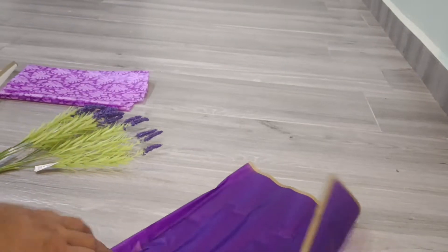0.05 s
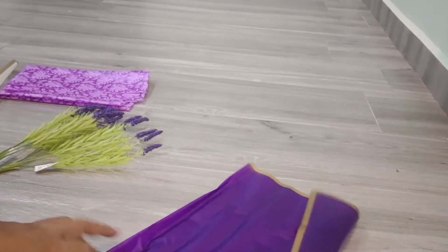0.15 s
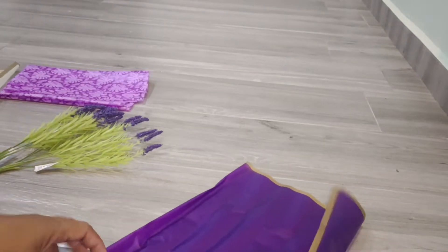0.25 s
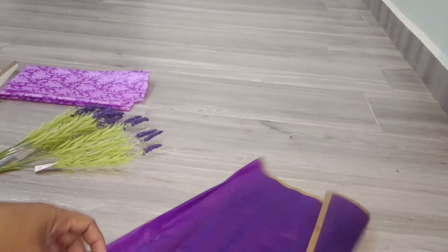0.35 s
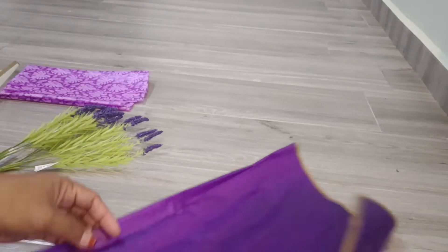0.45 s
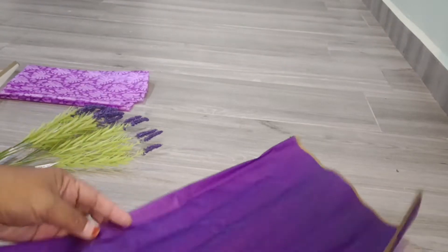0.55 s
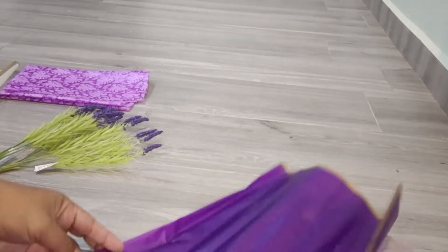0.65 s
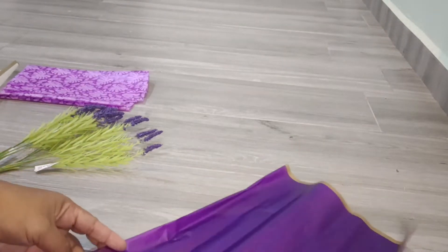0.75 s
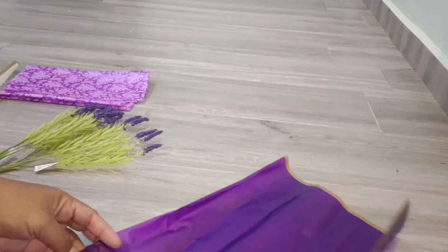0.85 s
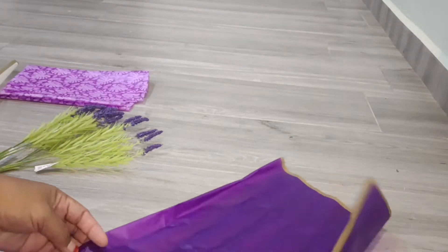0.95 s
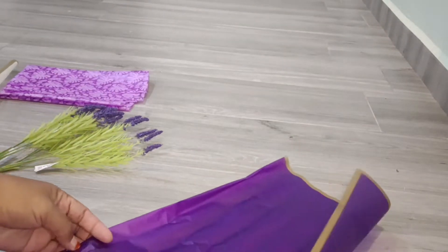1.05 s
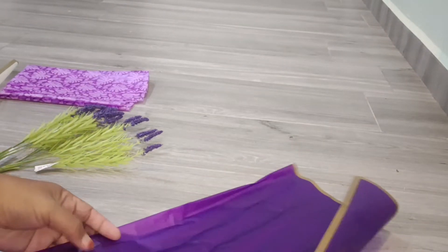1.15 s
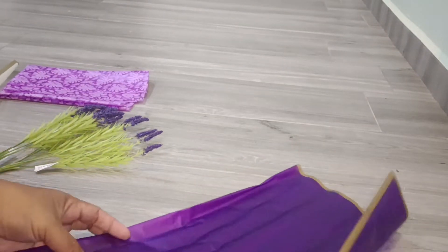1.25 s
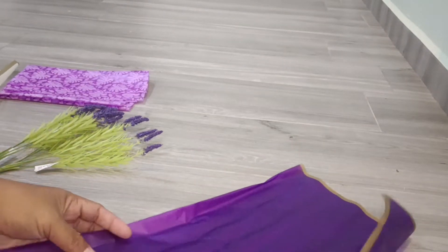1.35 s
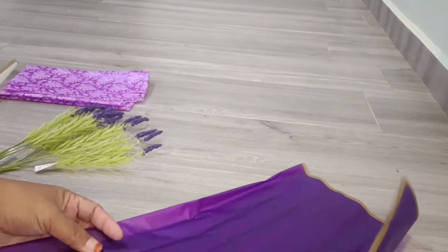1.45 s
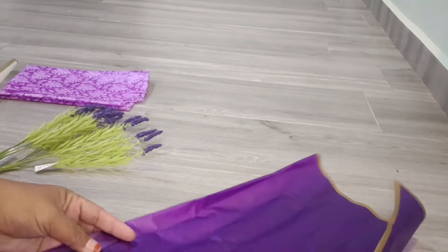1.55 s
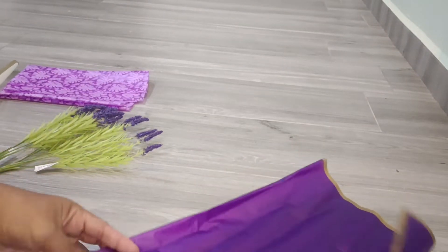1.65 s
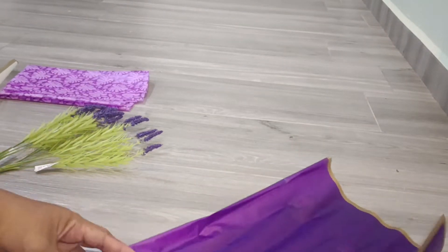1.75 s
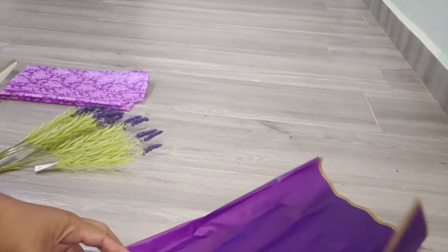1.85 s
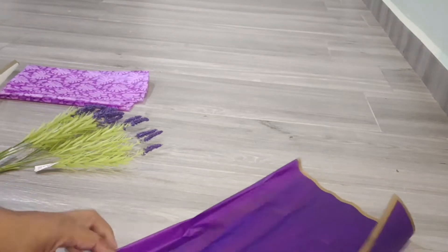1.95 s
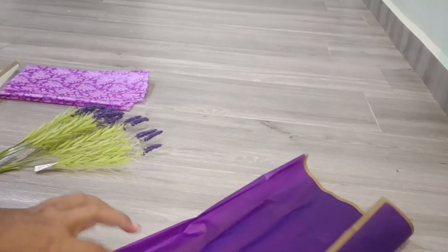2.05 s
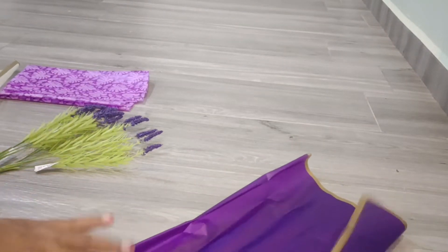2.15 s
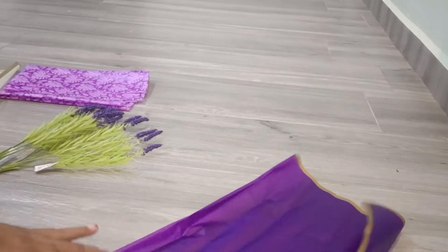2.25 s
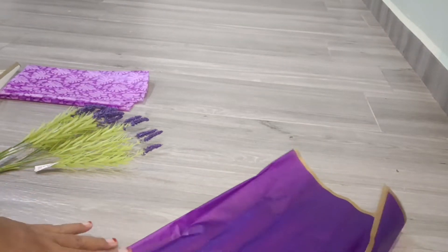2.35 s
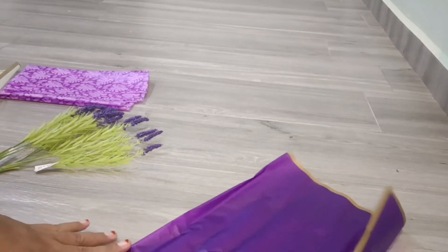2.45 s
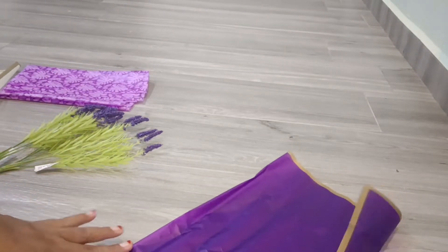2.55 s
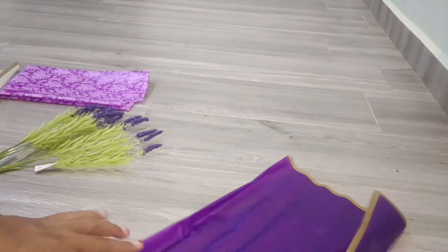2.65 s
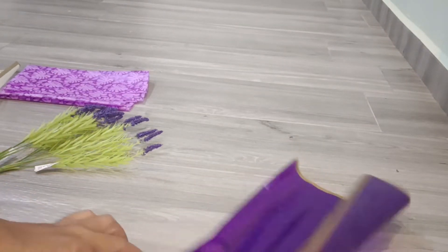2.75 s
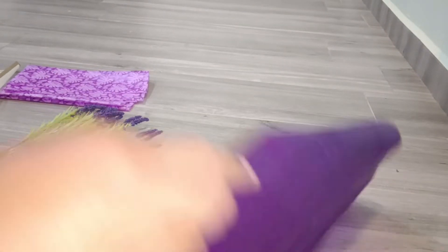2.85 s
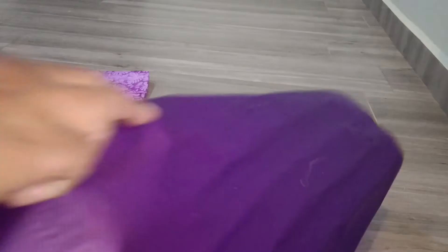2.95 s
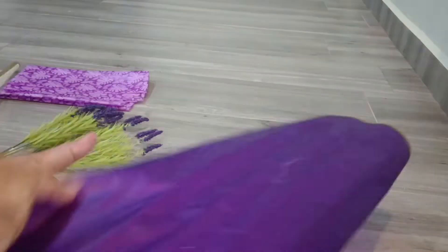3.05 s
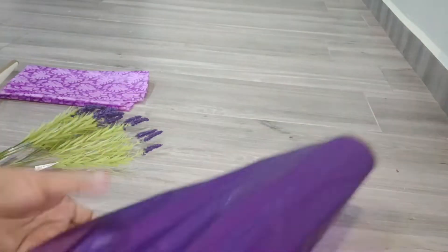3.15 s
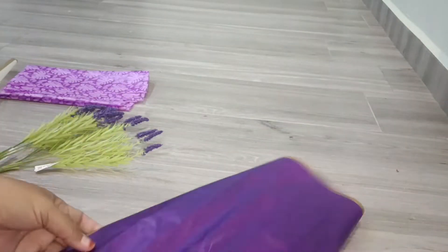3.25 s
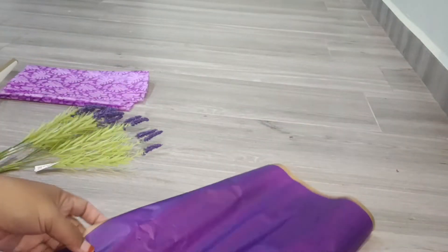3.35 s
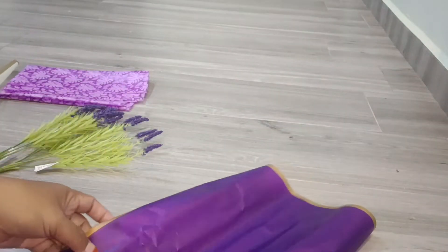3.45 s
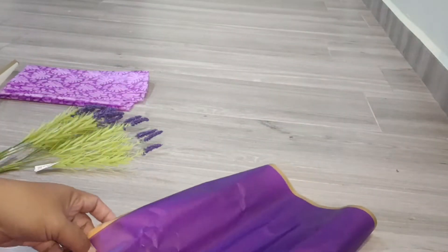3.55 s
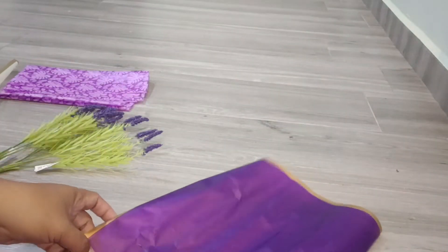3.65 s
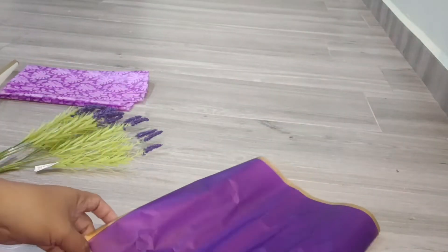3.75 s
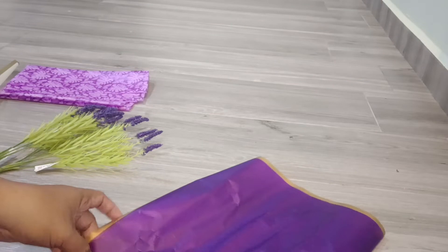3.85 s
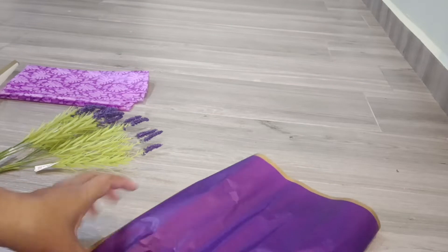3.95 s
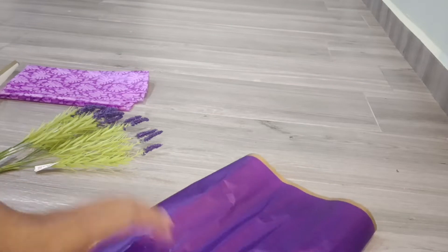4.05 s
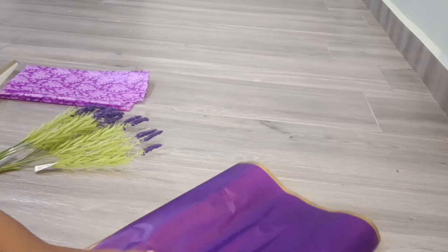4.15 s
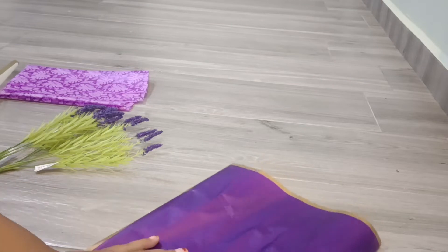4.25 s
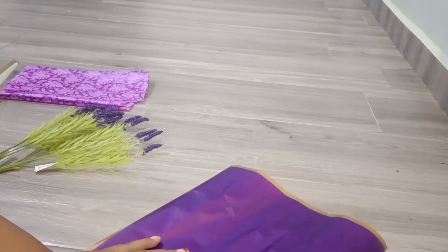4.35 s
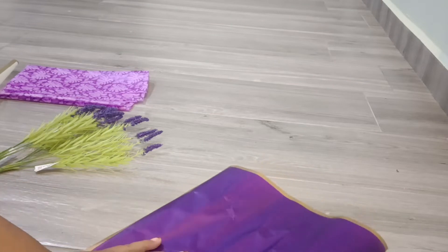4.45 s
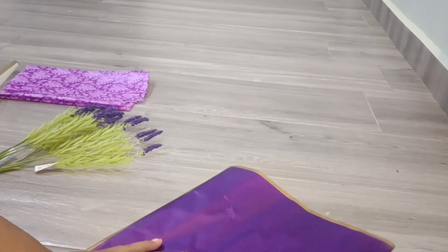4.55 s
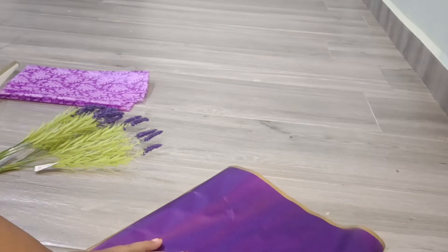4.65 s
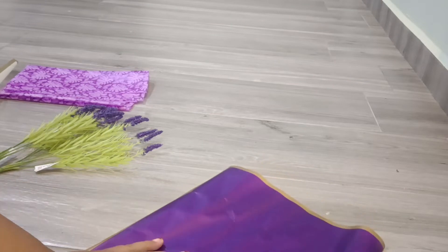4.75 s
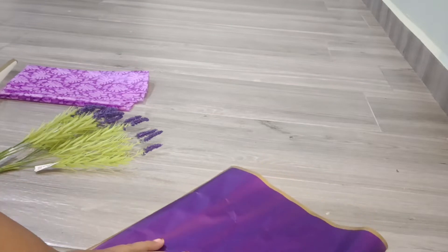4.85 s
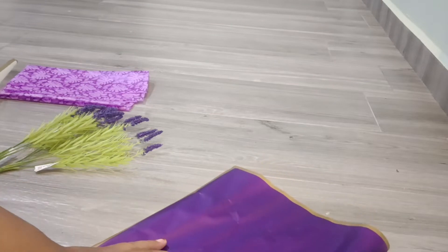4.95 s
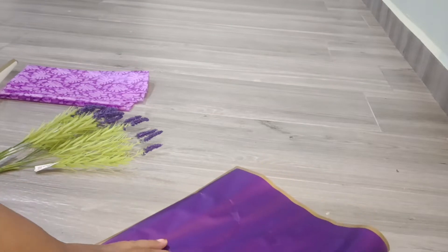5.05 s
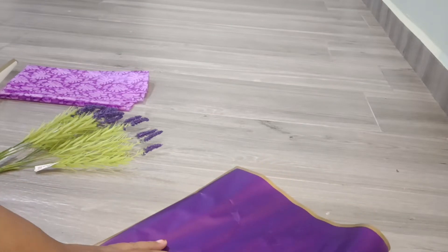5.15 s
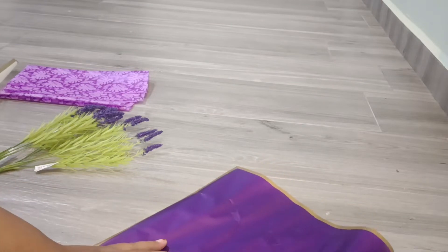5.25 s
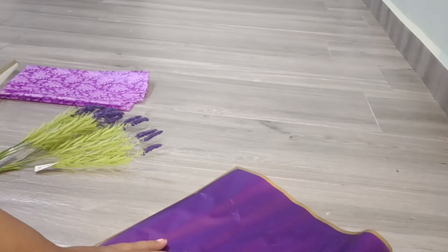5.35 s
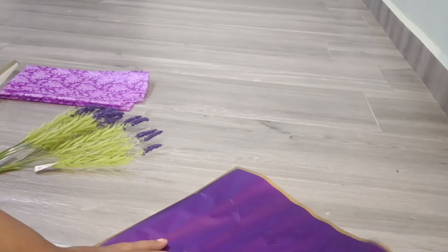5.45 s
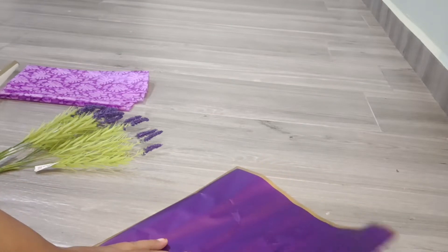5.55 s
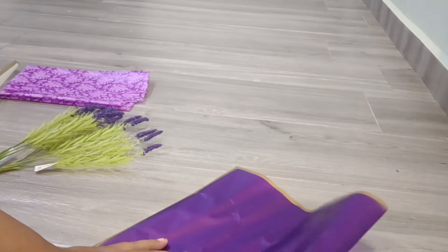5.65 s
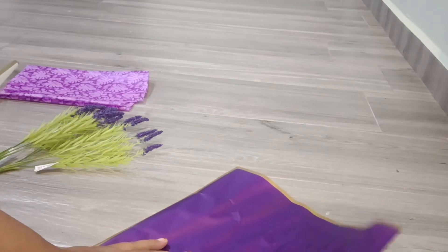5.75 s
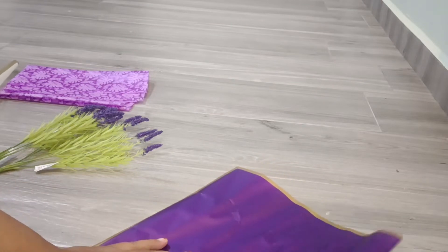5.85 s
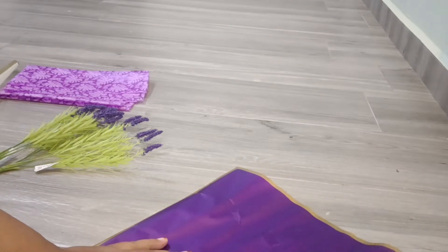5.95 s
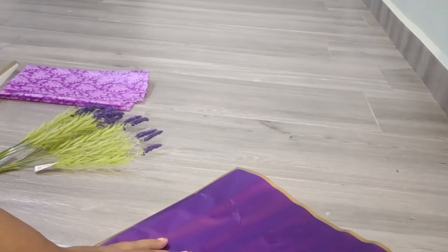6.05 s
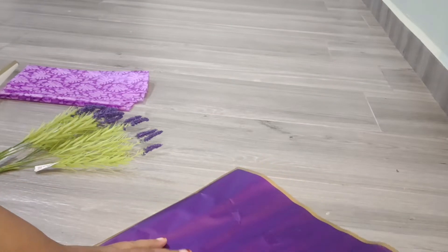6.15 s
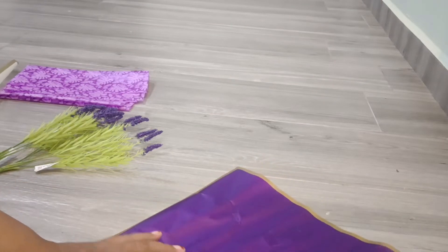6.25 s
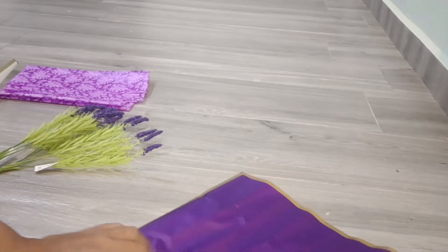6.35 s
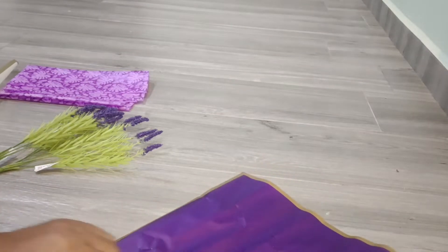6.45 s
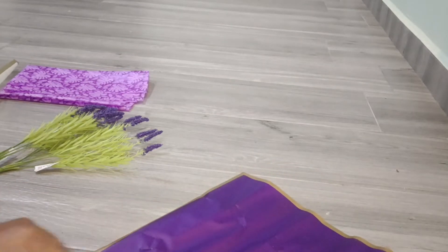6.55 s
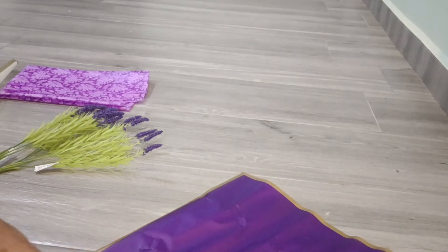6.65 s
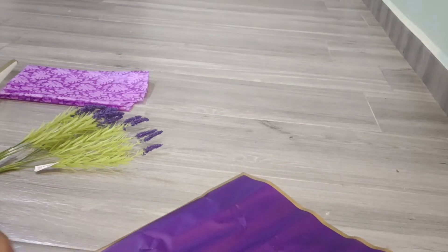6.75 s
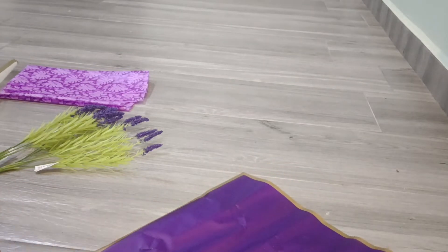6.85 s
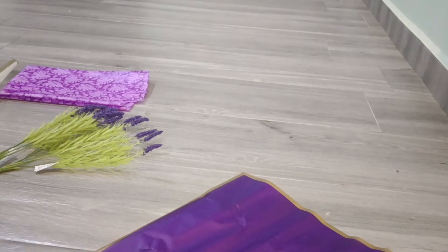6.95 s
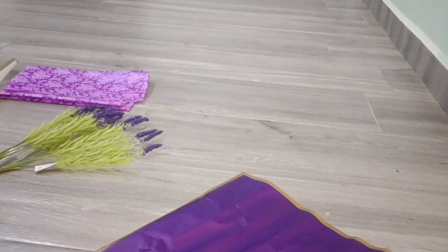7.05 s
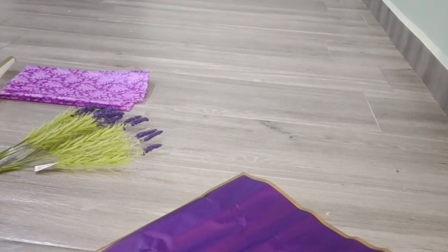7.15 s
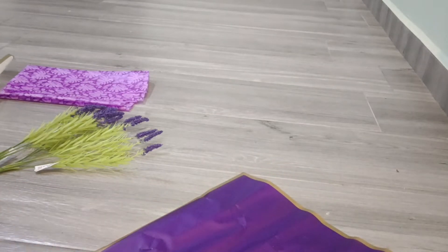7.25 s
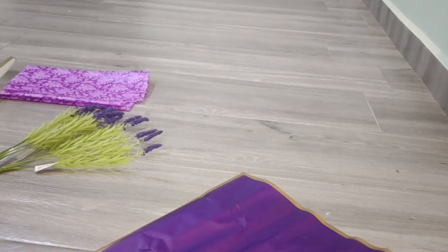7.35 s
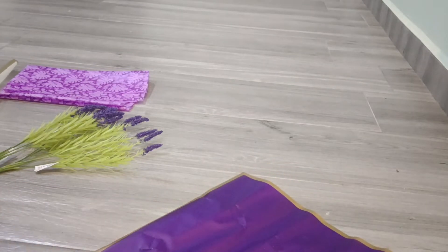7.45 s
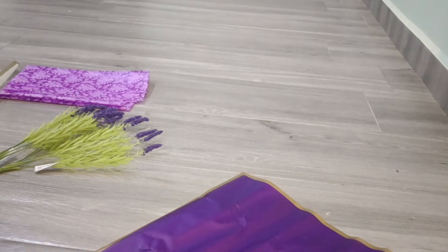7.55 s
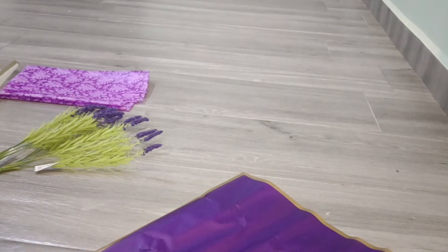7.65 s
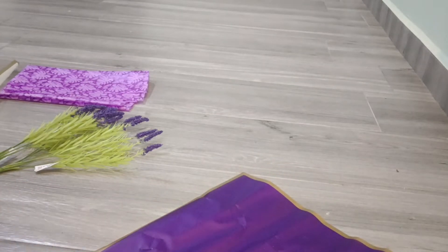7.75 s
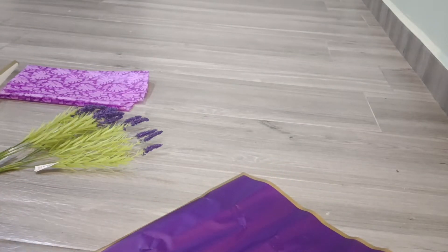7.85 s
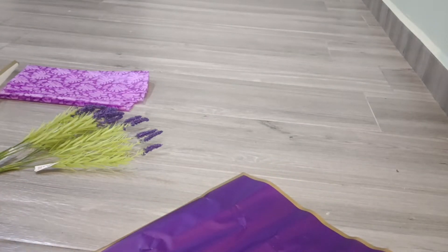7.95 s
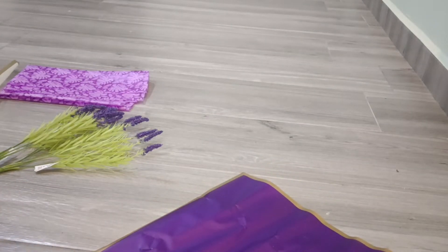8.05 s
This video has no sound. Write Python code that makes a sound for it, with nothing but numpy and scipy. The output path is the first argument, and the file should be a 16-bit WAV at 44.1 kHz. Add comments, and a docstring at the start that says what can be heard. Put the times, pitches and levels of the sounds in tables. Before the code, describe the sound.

Close, crisp crinkling of a sheet of wrapping paper being spread by hand, with sharp crease snaps and soft slaps on the floor.

```python
"""Stiff wrapping paper crackles close to the microphone as it is lifted, turned and smoothed out on a
hard floor. Creases snap through, each a click and a burst of noise from the shaken sheet; between them
countless small buckles rustle, the sheet slides, and three times it slaps the floor. The room answers
briefly. Far outside, traffic rumbles and whines over a faint floor of hiss."""
import sys
import numpy as np
from scipy import signal
from scipy.io import wavfile

SR = 44100
rng = np.random.default_rng(int(sys.argv[2]) if len(sys.argv) > 2 else 0)


def dump_mix(stems):
    """Bounce the given channels to the path in sys.argv[1] as a 16-bit WAV at rate SR."""
    frames = np.atleast_2d(stems).T  # one column per channel
    limited = np.clip(frames, -1, 1)  # hard clip at full scale
    pcm = np.round(limited * 32767).astype(np.int16)
    wavfile.write(sys.argv[1], SR, pcm)


N = 357629
CONTROL_STEP = 40   # samples between the points of a slow control
SNAP_RISE_S = 0.0003
USUAL_BODY_DB, USUAL_TREBLE_DB = -15.5, -7.0   # the balance that leaves the paper's colour untilted


def from_db(db):
    """Decibels to gain."""
    return 10 ** (np.asarray(db) / 20)


def rms_one(x):
    """Scaled to rms 1."""
    return x / np.sqrt(np.mean(x ** 2) + 1e-20)


def in_time(points):
    """Points of (time_s, value) joined by straight lines, one value a sample."""
    return np.interp(np.arange(N) / SR, *np.transpose(points))


def at_hz(points, hz):
    """Value of a spectrum on a log-frequency axis."""
    freq_hz, values = np.transpose(points)
    return np.interp(np.log(hz), np.log(freq_hz), values)


def per_sample(slow):
    """A slow control filled in to one value a sample."""
    return np.interp(np.arange(N) / CONTROL_STEP, np.arange(len(slow)), slow)


def drift(rate_hz):
    """Smooth random wander of spread 1."""
    pole = np.exp(-2 * np.pi * rate_hz * CONTROL_STEP / SR)
    white = rng.standard_normal(N // CONTROL_STEP + 2002)
    slow = signal.lfilter([1], [1, -2 * pole, pole * pole], white)[2000:]
    return per_sample(rms_one(slow))


def panned(left_right_db):
    """Gains of the left and right channels."""
    return from_db(np.multiply.outer([.5, -.5], left_right_db))


def slopes(start_s, length_s, rise_db_per_s, fall_db_per_s):
    """Age and envelope in dB as slow controls, a row an event: a climb to the start, a hold, a fall."""
    age = np.arange(0, N + CONTROL_STEP, CONTROL_STEP) / SR - np.reshape(start_s, (-1, 1))
    past_end = np.maximum(age - np.reshape(length_s, (-1, 1)), 0)
    return age, np.minimum(age, 0) * rise_db_per_s - past_end * fall_db_per_s


def bands(low_hz, likeness, lag_ms, count):
    """Third-octave bands: centre, filter and stereo noise of the given likeness and left-side lag."""
    white = rng.standard_normal((2, 2, N))   # two sets, so that neighbouring bands are unrelated
    n = np.arange(N)
    lagged = np.round(n - lag_ms * SR / 1000)
    shared = [np.array([np.interp(lagged, n, mid), mid]) for mid, _ in white]
    for k in range(count):
        low, high = low_hz * 2 ** (k / 3), low_hz * 2 ** ((k + 1) / 3)
        hz = np.sqrt(low * high)
        alike = np.clip(at_hz(likeness, hz), 0, 1)
        side = white[k % 2, 1] * [[1], [-1]]
        noise = (np.sqrt(1 + alike) * shared[k % 2] + np.sqrt(1 - alike) * side) / np.sqrt(2)
        yield hz, signal.butter(3, [low, min(high, .45 * SR)], "band", fs=SR, output="sos"), noise


def steady_noise(spectrum, low_hz, count, flicker_db):
    """Distant stereo noise of a given colour whose bands flicker a little; rms 1."""
    # how alike distant sound is in the two channels: freq_hz, likeness
    far_likeness = [(60, 0.49), (130, 1), (290, 0.24), (640, 0.13), (1400, 0.019), (16000, 0.0203)]
    return rms_one(sum(from_db(at_hz(spectrum, hz) + flicker_db * drift(7.0)) * signal.sosfilt(sos, noise)
                       for hz, sos, noise in bands(low_hz, far_likeness, 0, count)))


def narrow_noise(hz, width_hz):
    """Noise through a narrow resonance, unrelated in the two channels; rms 1."""
    radius = np.exp(-np.pi * width_hz / SR)
    poles = [1, -2 * radius * np.cos(2 * np.pi * hz / SR), radius * radius]
    return rms_one(signal.lfilter([1, 0, -1], poles, rng.standard_normal((2, N))))


def hiss():
    """The noise floor: a faint broad hiss with three thin, wavering bands in the treble."""
    # spectrum of the broad hiss: freq_hz, density_db
    colour = [(88, -30), (150, 0), (1310, -18.5), (3290, -18), (3930, -30), (6940, -24.5), (7970, -31),
              (15300, -33), (16500, -45)]
    # thin bands: centre_hz, width_hz, level_db
    thin_bands = [(3400, 100, -94.5), (7500, 98, -100), (14880, 150, -100)]
    broad = from_db(-79) * steady_noise(colour, low_hz=140, count=21, flicker_db=0.5)
    return broad + sum(from_db(level_db + 2.5 * drift(5)) * narrow_noise(hz, width_hz)
                       for hz, width_hz, level_db in thin_bands)


def traffic_rumble():
    """Far traffic outside: low noise gathered round one droning pitch, swelling now and then."""
    # spectrum of the rumble: freq_hz, density_db
    colour = [(15, -44), (25, -13), (64, -1), (81, 2), (146, -5.5), (182, -20), (210, -27.5), (220, -14),
              (230, -8), (300, -38), (510, -120)]
    # swells above the resting level: time_s, gain_db
    swells = [(.31, -75.5), (.6, -70), (.675, -71), (.8, -64.5), (.91, -60.5), (.99, -68), (1.06, -82),
              (1.17, -79.5), (1.69, -76), (1.83, -57.5), (2.13, -61), (2.39, -73.5), (2.53, -75),
              (2.7, -63.5), (3.0, -61.5), (3.15, -76), (3.32, -55), (3.42, -59), (3.64, -74.5), (3.79, -75),
              (4.05, -66.5), (4.21, -69.5), (4.29, -64.5), (4.61, -70), (4.77, -75.5), (5.01, -79),
              (5.15, -75), (5.47, -72), (6.14, -71.5), (6.41, -69.5), (6.5, -79.5), (7.07, -69),
              (7.39, -78), (7.75, -74)]
    rest_db, hold_s = -80.5, 0.03
    time_s, gain_db = np.transpose(swells)
    _, shape_db = slopes(time_s - hold_s / 2, hold_s, rise_db_per_s=401, fall_db_per_s=349)
    gain = per_sample(from_db(rest_db) + from_db(gain_db[:, None] + shape_db).sum(axis=0))
    drone = from_db(-3.5) * narrow_noise(hz=85.4, width_hz=4.1)[0]
    return gain * (steady_noise(colour, low_hz=29.17, count=9, flicker_db=2.0) + drone)


def motor_whines():
    """Far motors: nearly pure tones that glide slowly and waver."""
    # one whine a row: start_s, length_s, first_hz, last_hz, level_db, left_right_db
    whines = [(0.0, 0.14, 258, 258, -75.5, -17), (.25, 0.49, 273.5, 285, -78.5, -6),
              (1.06, .15, 303, 300, -77, -21), (1.75, .24, 335, 359, -60, -3.5),
              (1.988, 0.093, 356, 360, -70, -3), (2.2, .2, 364, 373, -69, -3),
              (1.754, .68, 281, 285, -70.5, -6), (2.668, 0.24, 350, 341, -69, 11),
              (3.455, 0.37, 274, 288, -77, -7), (4.036, 0.25, 886, 886, -75.5, -12),
              (4.277, .18, 880, 880, -73, -1), (4.955, 0.092, 504, 503, -72, -8),
              (6.889, 0.59, 255, 249, -70, -22.5)]
    fade_s = 0.072
    out, t = np.zeros((2, N)), np.arange(N) / SR
    for start_s, length_s, first_hz, last_hz, level_db, pan_db in whines:
        end_s = start_s + length_s
        hz = np.interp(t, [start_s, end_s], [first_hz, last_hz]) * (1 + 0.0091 * drift(25))
        fade = np.clip(np.minimum(t - start_s, end_s - t) / fade_s + .5, 0, 1) ** 2
        tone = np.sqrt(2) * np.sin(2 * np.pi * np.cumsum(hz) / SR)
        out += panned(pan_db)[:, None] * fade * from_db(level_db + 2.7 * drift(27)) * tone
    return out


def room(source, t60_s=0.22, wall_cut_hz=25000):
    """Nearby walls: eight feedback echoes a side, slightly duller on every round."""
    out = np.zeros((2, N))
    dull = np.exp(-2 * np.pi * wall_cut_hz / SR)
    for k, lag in enumerate((rng.uniform(0.0068, 0.028, 16) * SR).astype(int)):
        gain = from_db(-60 * lag / SR / t60_s)
        loop, state = source.copy(), [0.]
        for i in range(lag, N, lag):
            echo, state = signal.lfilter([gain * (1 - dull)], [1, -dull], loop[i - lag:i], zi=state)
            loop[i:i + lag] += echo[:N - i]
        out[k % 2] += (loop - source) * (-1) ** (k // 2)
    return out


def floor_slaps(rise_s=0.0058, t60_s=0.146):
    """The sheet slaps the floor and pushes out the air beneath it with a short dull ring."""
    # one slap a row: start_s, level_db, pitch_hz
    slaps = [(0.901, -43, 123), (2.129, -42, 150), (3.311, -47.5, 135)]
    out, t = np.zeros(N), np.arange(N) / SR
    for start_s, level_db, pitch_hz in slaps:
        age = np.maximum(t - start_s, 0)
        envelope = from_db(level_db - 60 * age / t60_s) * (1 - np.exp(-age / rise_s))
        out += envelope * np.sin(2 * np.pi * pitch_hz * age)
    return out


def hand_moves():
    """Level, body and treble of the rustle in dB: moves add in power, the loudest leads the colour."""
    # each move is a stretch of rustle: start_s, length_s, level_db, change_db, body_db, treble_db
    moves = [(0.0, 0.093, -37.5, -5.5, -12.5, -13.5), (0.179, 0.064, -32.5, -10, -13.5, -17),
             (0.344, 0.18, -40, -3.5, -14, -16), (0.543, 0.22, -42.5, 1, -11.5, -19),
             (0.776, 0.098, -40, 0, -20, -18.5), (0.995, .05, -52, 3, -9.5, -10.5),
             (1.133, 0.11, -49.5, 0, -18, -9), (1.265, .02, -35, -5, -19.5, -15),
             (1.337, .21, -43.5, -6, -18.5, -19), (1.545, 0.057, -41, 3, -13.5, -13.5),
             (1.66, 0.36, -49, 5, -28, -15.5), (2.132, 0.012, -37, -10, -9, -18),
             (2.195, 0.0088, -39, 1, -2.5, -16), (2.253, .17, -45.5, 3.5, -33, -7.5),
             (2.525, 0.011, -44, -3, -7, -9.5), (2.648, 0.22, -39.5, -9.5, -15, -15),
             (2.878, 0.007, -41.5, -8.5, -23.5, -22), (2.944, .01, -46.5, -5, -4, -29.5),
             (3.01, 0.046, -53.5, 8, -7.5, -11.5), (3.201, 0.013, -41, -3.5, -13.5, -13),
             (3.282, 0.062, -39, 7.5, -8.5, -16), (3.486, .015, -54.5, -7.5, -33, -0.5),
             (3.659, 0.053, -44, 14, -15.5, -13.5), (3.904, 0.058, -33.5, -1, -15, -15),
             (4.05, 0.2, -48.5, 10, -94, -13), (4.284, 0.18, -36, -19, -20, -13.5),
             (4.561, .15, -41, 4.5, -20, -12.5), (4.746, 0.25, -42, -11, -22.5, -10.5),
             (4.937, 0.25, -46, 3.5, -29, -12.5), (5.302, 0.0088, -46, 0.5, -66, -16),
             (5.397, 0.14, -50.5, 7.5, -36, -14.5), (5.664, 0.12, -37, -5, -13.5, -19.5),
             (5.857, 0.015, -30, -8, -17, -13), (5.936, 0.11, -56, 12, -8, -8.5),
             (6.124, 0.095, -47, -5.5, -31, -10), (6.256, 0.12, -40.5, 0.5, -16, -10),
             (6.545, 0.015, -50, 8.5, -27, -27.5), (6.572, 0.016, -44, -0.5, -14, 0),
             (6.729, 0.041, -72, -2, -51, 12)]
    start_s, length_s, level_db, change_db, body_db, treble_db = np.transpose(moves)[:, :, None]
    age, shape_db = slopes(start_s, length_s, rise_db_per_s=449.5, fall_db_per_s=171.5)
    power = from_db(level_db + change_db * np.clip(age / length_s, 0, 1) + shape_db) ** 2 + 1e-30
    total = power.sum(axis=0)
    body, treble = (per_sample((power * db).sum(axis=0) / total) for db in (body_db, treble_db))
    return per_sample(10 * np.log10(total)), body, treble


def fold_tilt_db(hz, body_db, treble_db):
    """Large folds add body below 1.3 kHz, the more the lower; sharp ones add treble above 5.5 kHz."""
    body = np.clip(np.log2(1300 / hz) / 0.9, 0, 1) + 0.28 * np.clip(np.log2(650 / hz), 0, 1)
    treble = np.clip(np.log2(hz / 5500) / 0.21, 0, 1)
    return body * (body_db - USUAL_BODY_DB) + treble * (treble_db - USUAL_TREBLE_DB)


def ring_down(clicks, t60_s):
    """Every click starts an envelope that rises quickly and decays exponentially."""
    rise = np.exp(-1 / (SNAP_RISE_S * SR))
    decay = from_db(-60 / (t60_s * SR))
    return signal.lfilter([1 - rise], np.convolve([1, -rise], [1, -decay]), clicks + 1e-18)


def rustle(hz, t60_s, moves, buckle_at, size_db):
    """Small buckles pop while the sheet slides over floor and fingers: one band's envelope and clicks."""
    level_db, body_db, treble_db = moves
    buckles = np.zeros(N)
    buckles[buckle_at] = from_db(size_db + rng.normal(0, 2.9, len(buckle_at)))
    bursts = ring_down(buckles, t60_s)
    buckle_gain = 0.82 / np.sqrt(np.mean(bursts ** 2))
    # the curved sheet favours changing low bands
    hollow_db = 3.4 * drift(8.2) * np.clip(np.log2(2500 / hz), 0, 1)
    # pressed flat, it has little body and slides more than it crackles
    slide_db = -0.5 + 0.25 * (USUAL_BODY_DB - body_db)
    sliding = from_db(slide_db + drift(25))
    gain = from_db(level_db + fold_tilt_db(hz, body_db, treble_db) + hollow_db)
    gain /= np.sqrt(.5 + from_db(slide_db) ** 2)
    return gain * (buckle_gain * bursts + sliding), gain * buckle_gain * buckles


def crease_snaps(hz, t60_s):
    """Creases snap through with a pressure click and a short burst: one band's envelope and clicks."""
    # the loudest creases: time_s, level_db, ring_hz, body_db, treble_db, left_right_db
    creases = [(0.0877, -39, 1730, -27, -13, -0.5), (0.161, -28, 1600, -22, -19, -5),
               (0.2093, -27.5, 5300, -34, -6.5, -1.0), (0.229, -24.5, 1930, -18, -36, -3),
               (0.3341, -22.5, 5040, -23, -14, -1), (0.399, -40, 2470, -40, -2, -1.5),
               (0.4115, -24.5, 5200, -38, -8, 0), (0.4372, -24, 1830, -20, -26, 0.5),
               (0.4705, -36, 2290, -37, -15, 2.5), (0.4888, -26, 5080, -13, -6.5, -3.5),
               (0.5154, -25, 1900, -5.5, -31, -2), (0.5731, -33.5, 1980, -15, -29, -4),
               (0.596, -28.5, 1040, -10, -23, -10), (0.623, -21.5, 2110, -37, -7.5, -1),
               (0.6432, -34, 1970, -26, -10.5, -2), (0.6785, -25.5, 1970, -13, -14.5, 1),
               (0.717, -33, 4860, -24, -21, -0.5), (0.7692, -33.5, 2630, -23, -15, -2),
               (0.796, -35, 2300, -34, -3, -1.5), (0.8113, -32, 2550, -30, -13, -1.0),
               (0.8704, -39, 2280, -43, -43, -0.5), (1.0005, -29, 1310, -16, -21, -3.0),
               (1.026, -38, 5610, -29, -6.5, -0.5), (1.1374, -35.5, 5080, -17, -13, 2.5),
               (1.1534, -30, 5600, -23, -13, -15.5), (1.2522, -25, 1670, -46, -17, 1.5),
               (1.3164, -39, 2010, -22, -17, -5), (1.408, -25.5, 1720, -24, -14.5, 1),
               (1.4521, -24.5, 2260, -33, -19, -2), (1.508, -27, 5560, -16.5, -12, -7.5),
               (1.5251, -21, 3560, -16, -10, 0.5), (1.568, -15.5, 1740, -19, -12, -1.5),
               (1.6221, -21, 2000, -32, -15.5, -2), (1.716, -26.5, 5200, -73, -9.5, -18),
               (1.739, -40.5, 5460, -49, 6.5, 3.0), (1.8592, -37, 3850, -36, -6, -6.5),
               (1.8586, -26, 5330, -41, -15.5, -1), (1.8852, -31, 3130, -17, -15, 0),
               (1.9315, -35.5, 5440, -20, -7, -5), (2.1078, -26.5, 2640, -26, -33, 2),
               (2.1213, -21.5, 2080, -13, -19, 1), (2.1919, -16, 1740, -27, -21, 0),
               (2.3139, -32, 6100, -21, -7, -1.0), (2.343, -29, 2620, -39, -23, -3),
               (2.38, -31.5, 5430, -51, -15, 15), (2.5263, -27.5, 1950, -31, -34, 11.5),
               (2.6115, -38.5, 3500, -28, -21, 13), (2.6434, -22.5, 2040, -61, -38, 1),
               (2.6974, -28, 3690, -9, -20, -0.5), (2.7691, -28.5, 2180, -8.5, -14.5, -0.5),
               (2.8052, -30.5, 2220, -24, -18, -6), (2.8556, -31, 1990, -25, -20, 1.5),
               (2.9445, -30.5, 2700, 2, -27.5, -2), (2.9973, -20, 2300, -3, -7, 3),
               (3.0913, -34, 4800, -26, -8, 6.5), (3.1031, -17, 5240, -15, -20, -0.5),
               (3.2853, -35, 1620, -34, -14.5, 4.0), (3.2894, -31, 5100, -26, -21, 6.5),
               (3.3084, -12, 1100, -7, -29.5, -2), (3.3604, -23.5, 3580, -7, -12.5, 2),
               (3.4925, -41, 2530, -33, -14, -4), (3.5107, -29.5, 1490, -34, -21, -1),
               (3.5677, -29.5, 1560, -51, -17.5, -4), (3.6326, -36.5, 1940, -28, -20, -2.5),
               (3.6388, -30.5, 1620, -17, -19, -2.5), (3.6564, -21.5, 1200, -2, -10.5, -1),
               (3.6849, -25.5, 5500, -14, -23, 4.5), (3.704, -29.5, 1760, -13, -15.5, -2),
               (3.7464, -21, 4800, -27, -13.5, -4.5), (3.9, -17.5, 3980, -22, -12, 2),
               (3.964, -31.5, 1710, -21, -0.5, 3), (4.0037, -29, 2170, -15, -11, -2),
               (4.0916, -34.5, 2200, -41, -27, 4), (4.2505, -33.5, 3180, -30, -14, 1.0),
               (4.2613, -27, 3650, -21.5, -19, -5), (4.3448, -23, 1760, -33, -30.5, 1),
               (4.3944, -27.5, 2420, -45, -28, 2), (4.4322, -34.5, 3110, -29, -7.5, 0),
               (4.5335, -32, 2310, -44, -12.5, -3.5), (4.538, -35.5, 1900, -45, -13.5, 1.5),
               (4.56, -31.5, 2070, -40, -4.5, 2), (4.591, -33.5, 2000, -33.5, -10, 0.5),
               (4.6247, -21.5, 2370, -16, -11.5, 2), (4.6354, -20, 3300, -28, -9.5, 0.5),
               (4.6636, -19, 2200, -9, -14, 1.0), (4.6937, -22, 1830, -11, -16.5, 5.5),
               (4.7126, -21, 2800, -8, -9, 0.5), (4.9933, -38.5, 2890, -22, -25.5, -5),
               (5.009, -27.5, 2010, -18, -25.5, 4), (5.0418, -26.5, 2340, -26, -16.5, 0),
               (5.0679, -42, 2000, -45, -4, 9), (5.0926, -29, 2330, -56, -15, 1),
               (5.1177, -31, 1800, -54, -25, -1.0), (5.1592, -25, 2880, -46, -16.5, -2.5),
               (5.2854, -40, 2270, -47, -29, 10), (5.3865, -30.5, 2730, -44, -11, 0),
               (5.4282, -30, 2830, -37, -27, -2), (5.4671, -30.5, 2760, -52, -11.5, 0),
               (5.5134, -28.5, 2100, -50, -13, 0.5), (5.6162, -28, 4800, -42, -16, 2.5),
               (5.6497, -33.5, 2840, -25, -25, 2), (5.665, -27, 1990, -6, -12, 2.5),
               (5.713, -32.5, 2010, 3, -18.5, 5.5), (5.7384, -26, 1930, -7, -13, -1),
               (5.802, -27.5, 1880, -8, -33, -4), (5.8342, -27.5, 1600, -13, -11.5, 2),
               (5.8885, -30, 1500, -22.5, -39, -8), (5.9216, -28.5, 2050, -23, -13, 3),
               (5.9547, -30, 5500, -42, -7.5, 6), (5.9594, -22.5, 6500, -44, -9, -3),
               (5.9834, -26, 5400, -34, -7.5, 7), (6.0048, -21.5, 3800, -15, -14, 3),
               (6.2108, -38, 5130, -36, -24, 2), (6.2392, -41.5, 3110, -17, -6, 4.5),
               (6.2552, -23, 1720, -21, -26, -3), (6.3082, -23.5, 3980, -37, -20, 4),
               (6.3389, -27.5, 1850, -26, -15.5, 2), (6.4432, -33, 3130, -43, -11.5, -5.5),
               (6.5023, -31, 3920, -58, -17.5, 11.5), (6.5353, -33, 1860, -43.5, -15.5, 0),
               (6.5799, -15.5, 2950, -37, -19, -1.5), (6.6203, -32, 2570, -43, -14, -1),
               (6.7177, -30.5, 3720, -91, -6, 4.5), (6.7442, -38, 1860, -65, -28, -2),
               (6.7627, -36.5, 2430, -66, -17, 10)]
    click_gain = 2.4
    time_s, level_db, ring_hz, body_db, treble_db, pan_db = np.transpose(creases)
    onsets = np.round((time_s - SNAP_RISE_S) * SR).astype(int)
    ring_db = 6.3 * np.exp(-(np.log2(hz / ring_hz) / 0.26) ** 2)   # each rings near a pitch of its own
    band_db = level_db + ring_db + fold_tilt_db(hz, body_db, treble_db) + rng.normal(0, 2.0, len(onsets))
    snaps = np.zeros((2, N))
    snaps[:, onsets] = panned(pan_db) * from_db(band_db)
    attack = 0.51 * ring_down(snaps, t60_s=0.0019)   # the first instant of a burst is stronger
    return ring_down(snaps, t60_s) + attack, click_gain * snaps


def paper():
    """The sheet at close range: snaps and rustle shake it into fast-dying noise, band by band."""
    # spectrum of the sheet: freq_hz, density_db
    colour = [(160, -43), (280, -22), (344, -24), (422, -22.5), (680, -11.5), (1150, -12), (1740, -3.5),
              (3680, -3.5), (4360, -9), (5260, -1), (7790, -8), (12600, -6.5), (15200, -16), (16500, -48)]
    # how fast its shaking dies: freq_hz, t60_s
    decay = [(300, 0.017), (1000, 0.025), (3000, 0.018), (8000, 0.023), (16000, 0.021)]
    # how alike it sounds in the two channels: freq_hz, likeness
    likeness = [(300, 0.49), (1000, .55), (3000, 0.6), (8000, 0.41), (16000, 1)]
    # how much later the left microphone hears it: time_s, lag_ms
    left_lag = [(0, 0.11), (3.2, 0.11), (3.8, 0.017), (5.5, 0.00084), (8.2, 0.011)]
    # its low end, full while it hangs free and thin when it lies on the floor: time_s, gain_db
    depth = [(0, -9), (1.4, -0.5), (2.4, 2.5), (2.9, 5.5), (3.3, 0.5), (4.0, -2.5), (4.6, -6), (5.6, -10.5),
             (6.0, -1.5), (6.8, -1.5)]
    moves, depth_db = hand_moves(), in_time(depth)
    buckles_per_s = 300 * from_db(3.0 * drift(25))   # small buckles come in clumps
    buckle_at = np.flatnonzero(rng.random(N) < buckles_per_s / SR)
    size_db = 5.2 * np.minimum(rng.exponential(1, N), 4.5)[buckle_at]   # many weak, few strong
    lag_ms = in_time(left_lag) + .07 * drift(90)   # the buckles jump about the sheet
    out = np.zeros((2, N))
    for hz, sos, noise in bands(266.1, likeness, lag_ms, count=18):
        t60_s = at_hz(decay, hz)
        snap_envelope, snap_clicks = crease_snaps(hz, t60_s)
        rustle_envelope, buckle_clicks = rustle(hz, t60_s, moves, buckle_at, size_db)
        shaking = (snap_envelope + rustle_envelope) * noise + snap_clicks + buckle_clicks
        low_end_db = depth_db * np.clip(np.log2(520 / hz) / .4, 0, 1)
        band = from_db(at_hz(colour, hz) + low_end_db + 4.5) * signal.sosfilt(sos, shaking)
        out += np.roll(band, -int(1.8 * SR / hz), axis=1)   # undo the filter delay: bands speak at once
    return out


def scene():
    """Paper close to the microphone, the room around it, traffic far off and hiss under all."""
    sheet = paper() + floor_slaps()
    background = traffic_rumble() + hiss() + motor_whines()
    return background + from_db(-15) * room(sheet.mean(axis=0)) + sheet


def record(dry):
    """The microphone rolls off at the very top, and a steep filter cuts what lies above."""
    roll_off_hz, cutoff_hz = 15600, 16600
    soft = signal.sosfilt(signal.butter(4, roll_off_hz, fs=SR, output="sos"), dry)
    return signal.sosfilt(signal.cheby2(12, 60, cutoff_hz, fs=SR, output="sos"), soft)


dry = scene()
out = record(dry)
dump_mix(out)
```